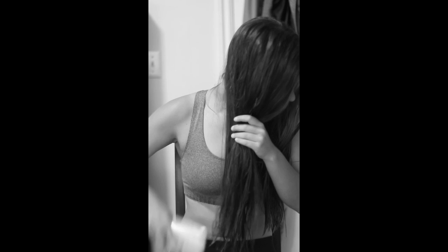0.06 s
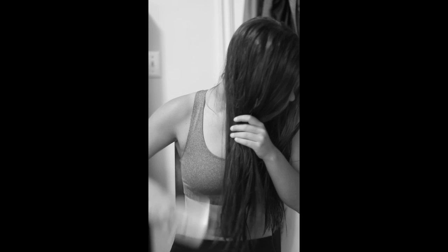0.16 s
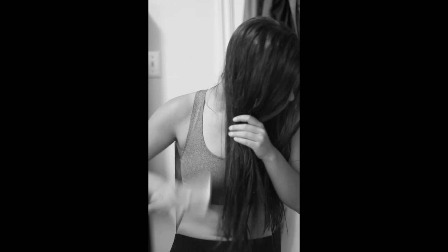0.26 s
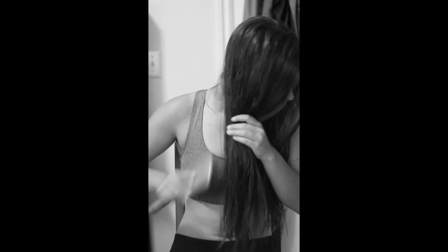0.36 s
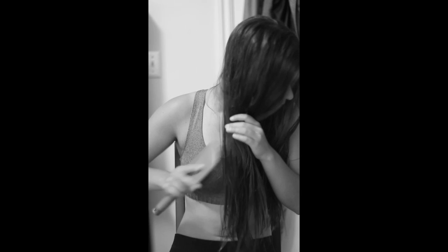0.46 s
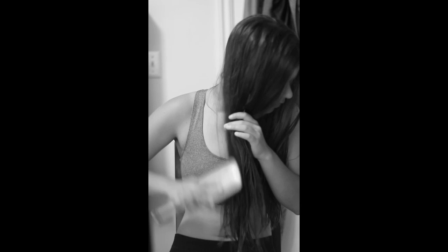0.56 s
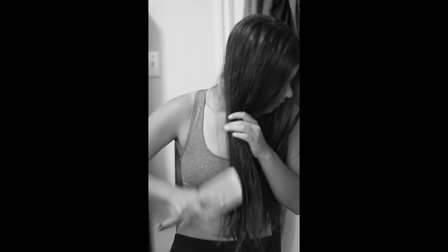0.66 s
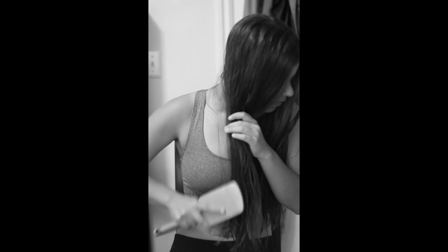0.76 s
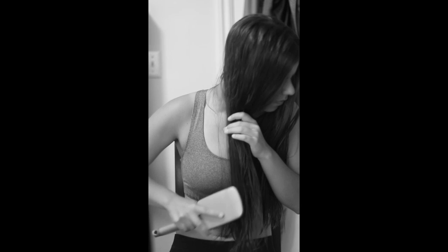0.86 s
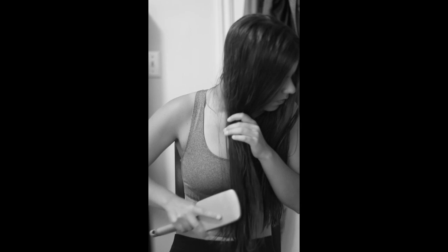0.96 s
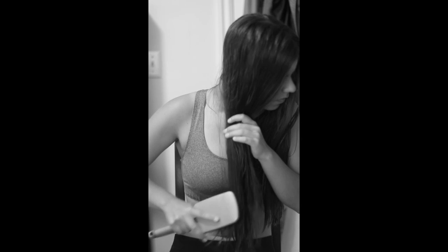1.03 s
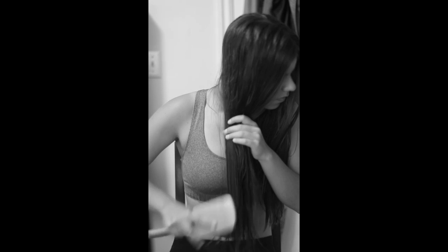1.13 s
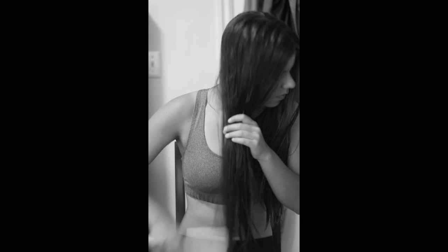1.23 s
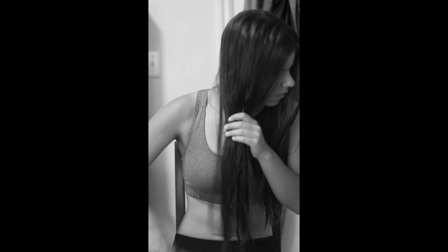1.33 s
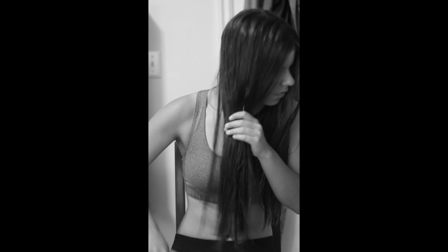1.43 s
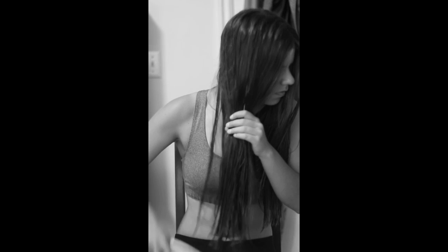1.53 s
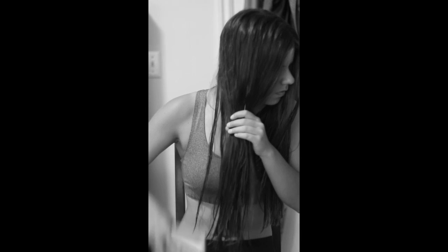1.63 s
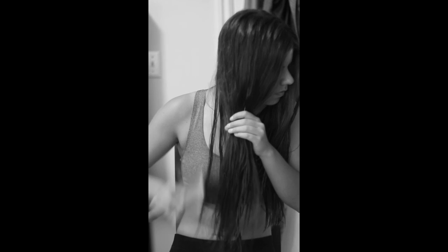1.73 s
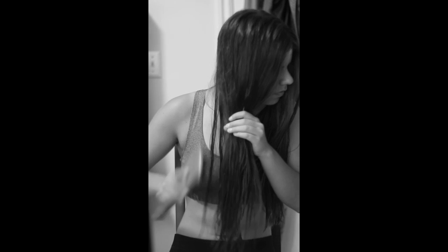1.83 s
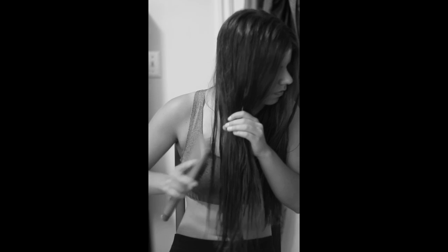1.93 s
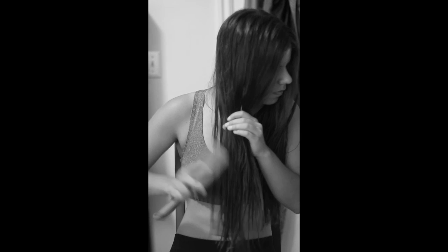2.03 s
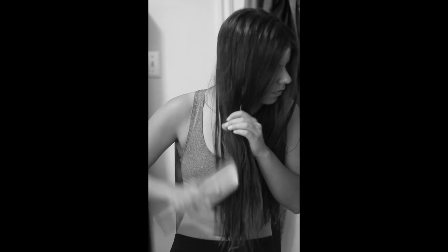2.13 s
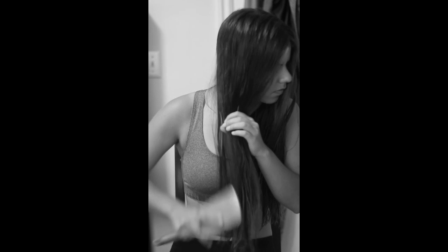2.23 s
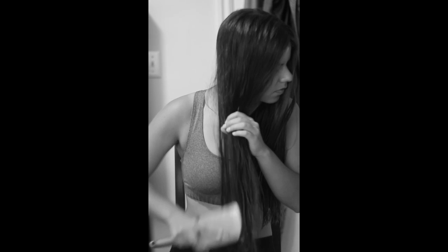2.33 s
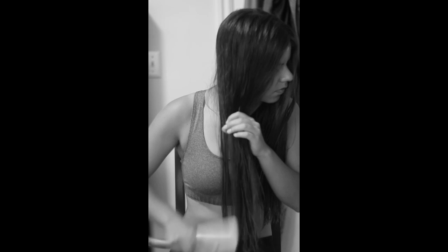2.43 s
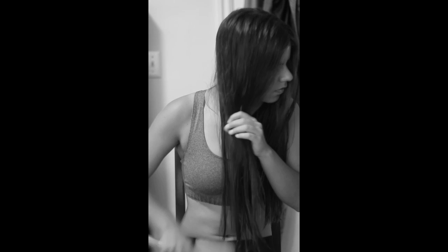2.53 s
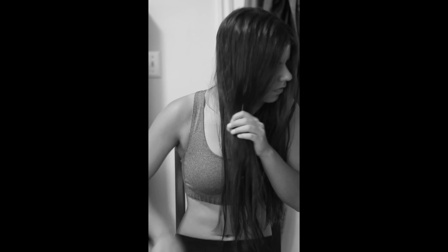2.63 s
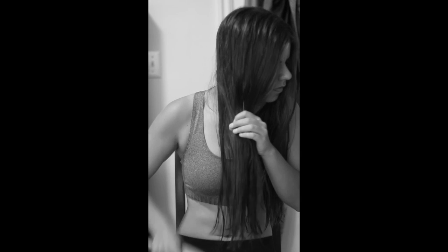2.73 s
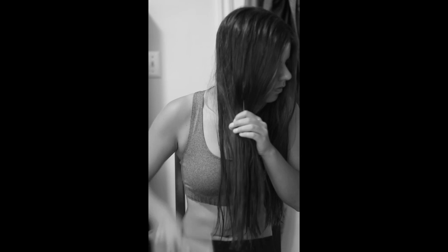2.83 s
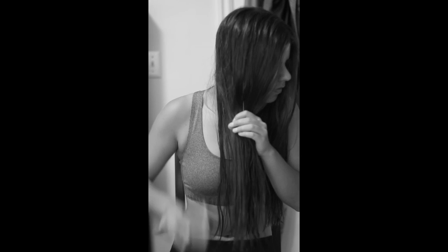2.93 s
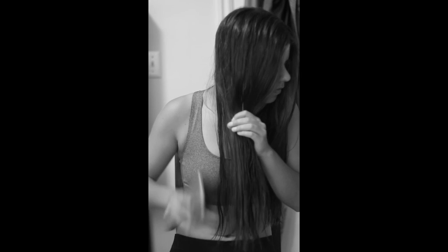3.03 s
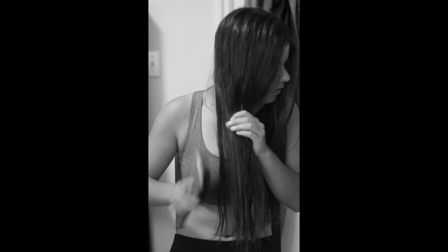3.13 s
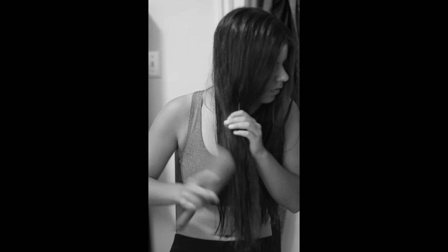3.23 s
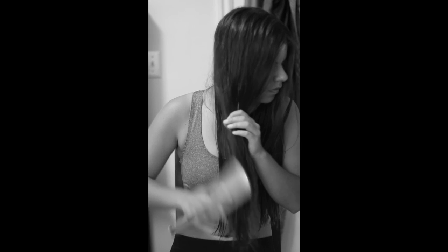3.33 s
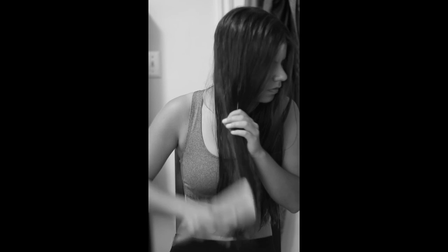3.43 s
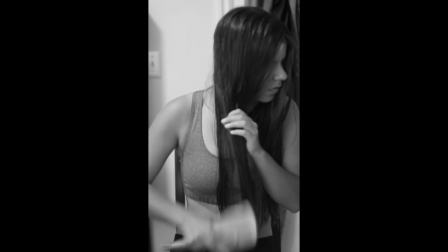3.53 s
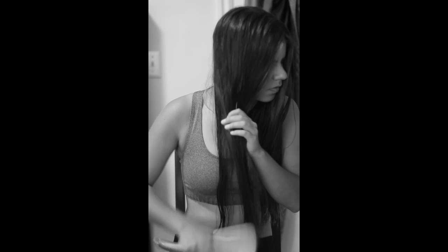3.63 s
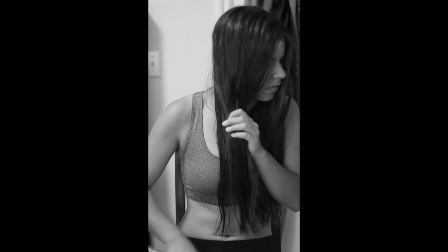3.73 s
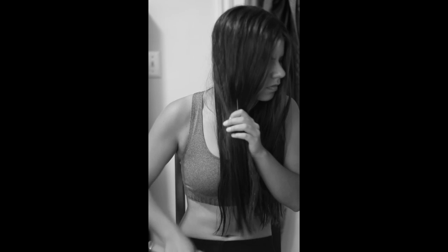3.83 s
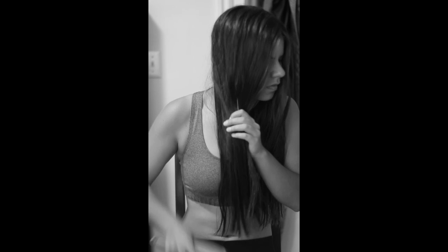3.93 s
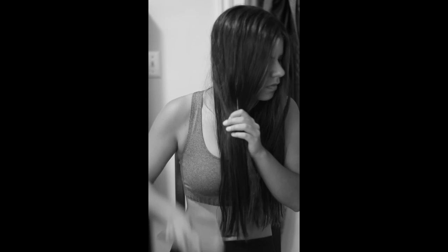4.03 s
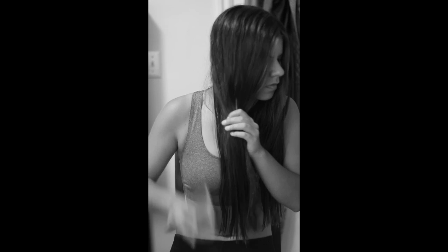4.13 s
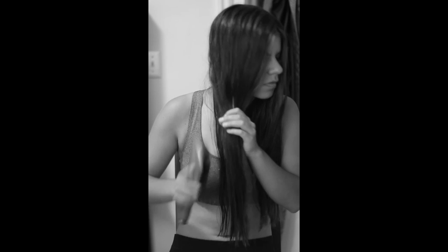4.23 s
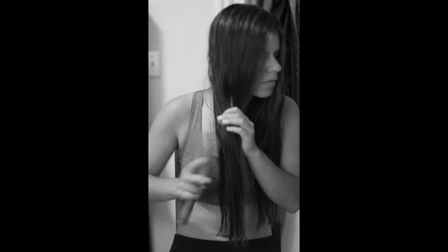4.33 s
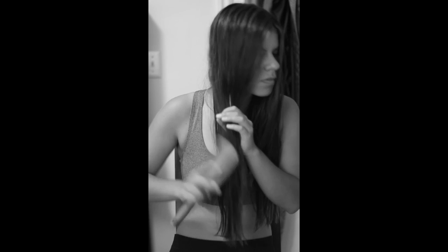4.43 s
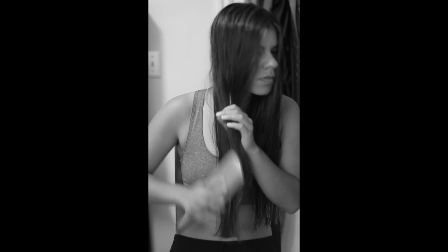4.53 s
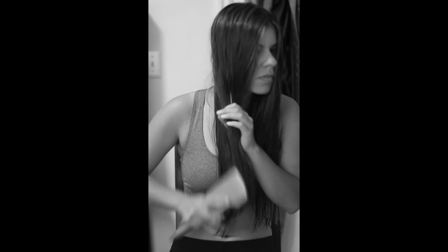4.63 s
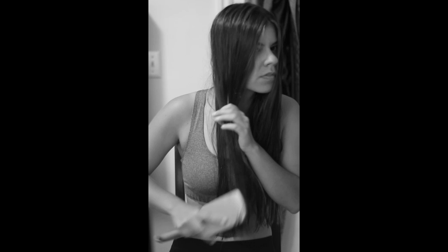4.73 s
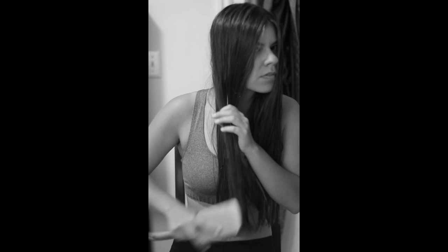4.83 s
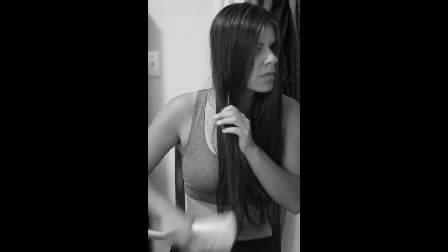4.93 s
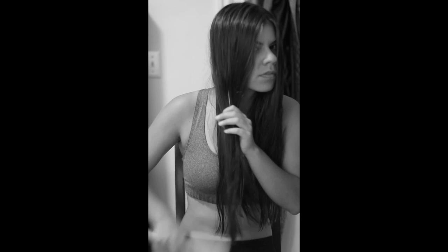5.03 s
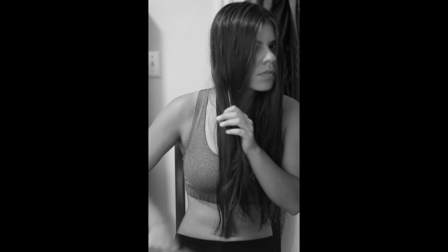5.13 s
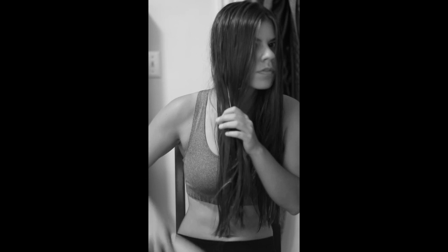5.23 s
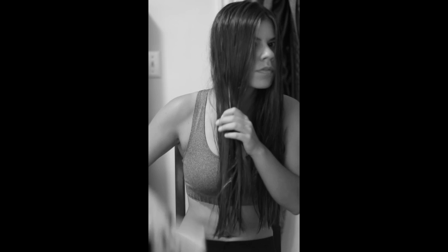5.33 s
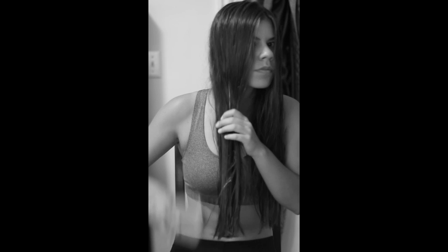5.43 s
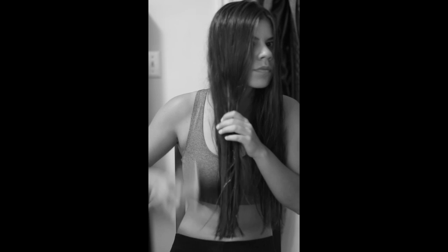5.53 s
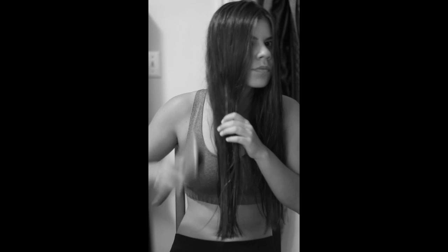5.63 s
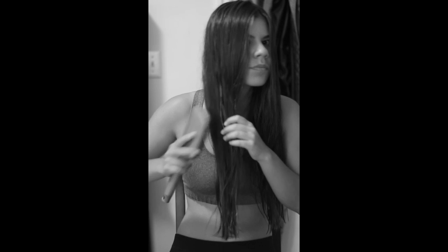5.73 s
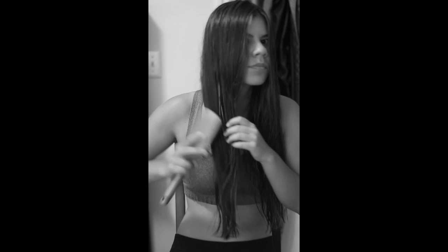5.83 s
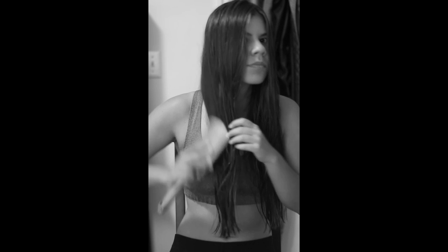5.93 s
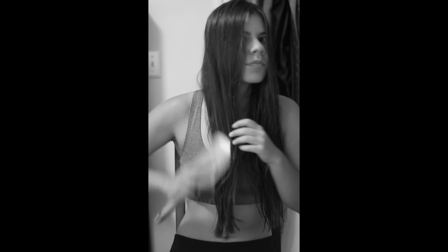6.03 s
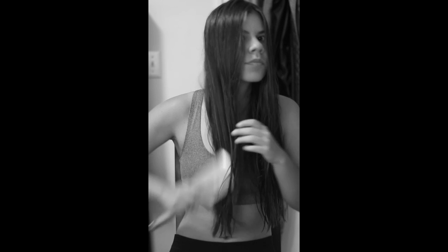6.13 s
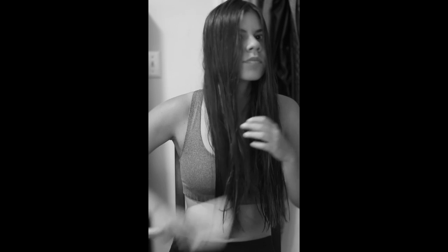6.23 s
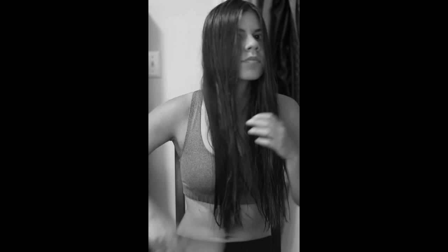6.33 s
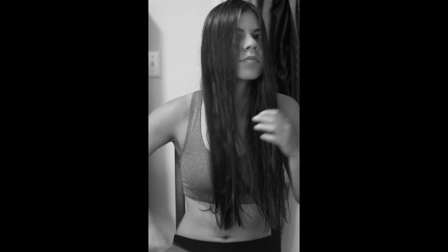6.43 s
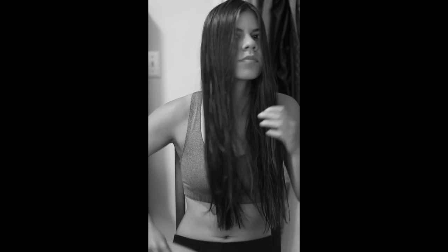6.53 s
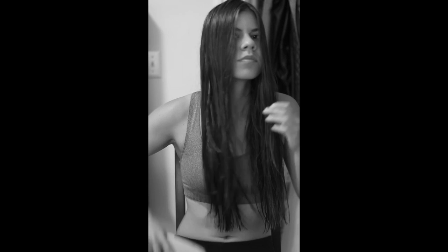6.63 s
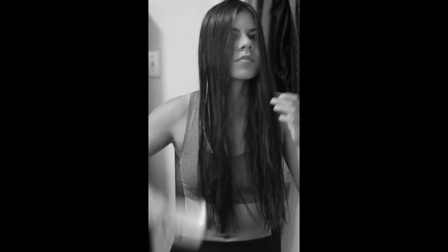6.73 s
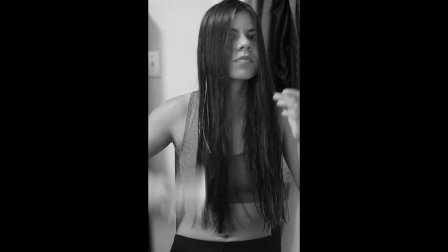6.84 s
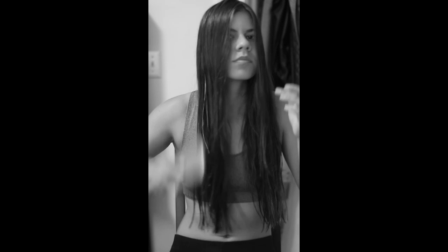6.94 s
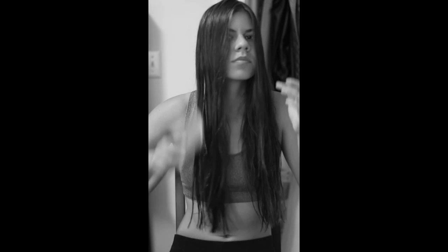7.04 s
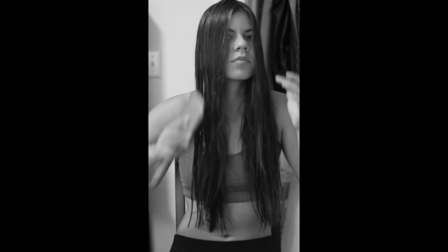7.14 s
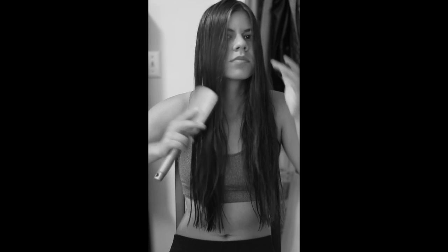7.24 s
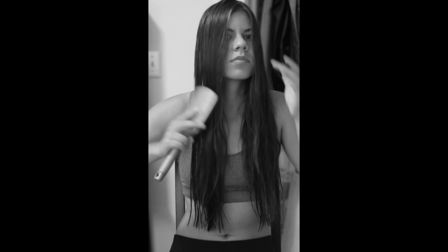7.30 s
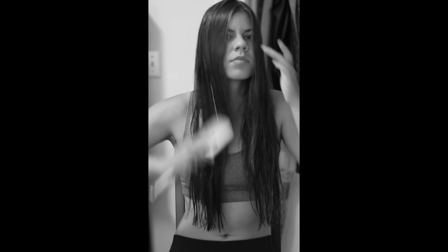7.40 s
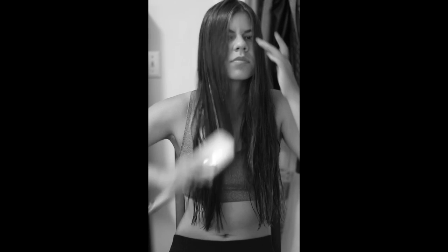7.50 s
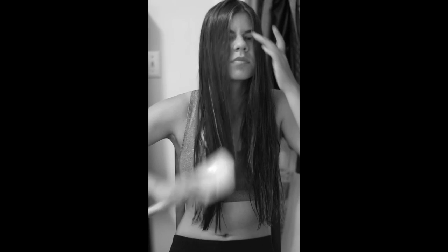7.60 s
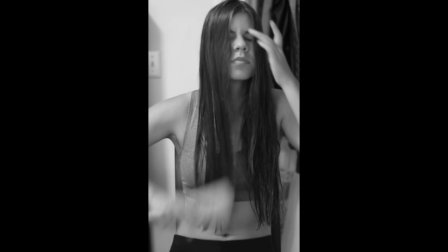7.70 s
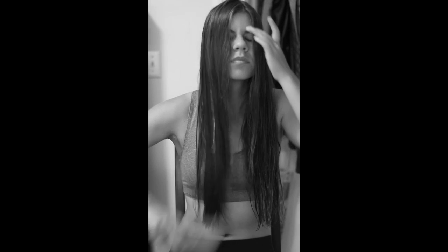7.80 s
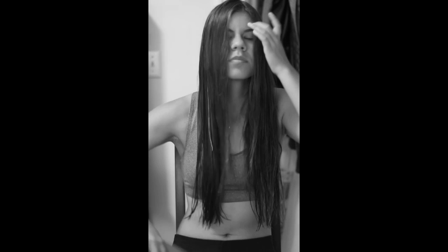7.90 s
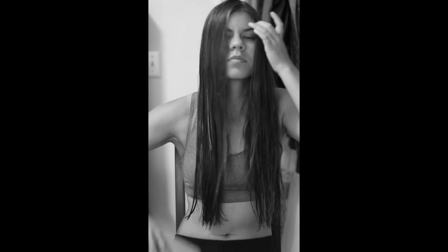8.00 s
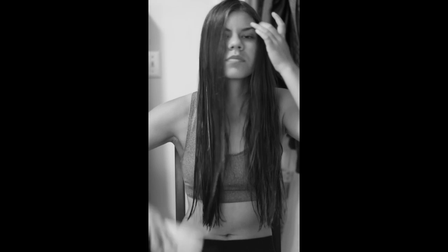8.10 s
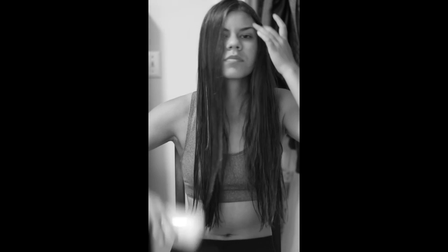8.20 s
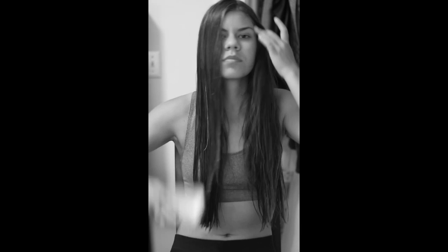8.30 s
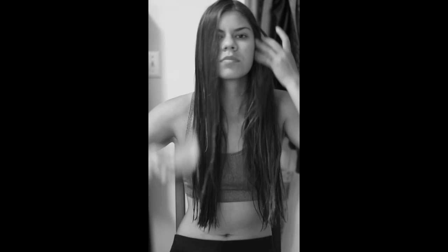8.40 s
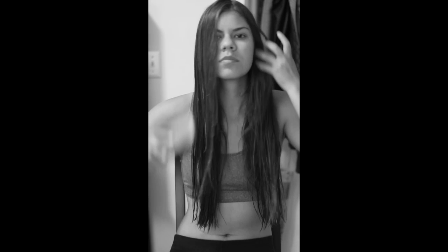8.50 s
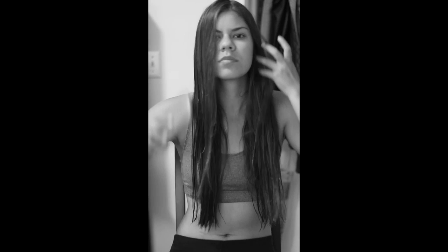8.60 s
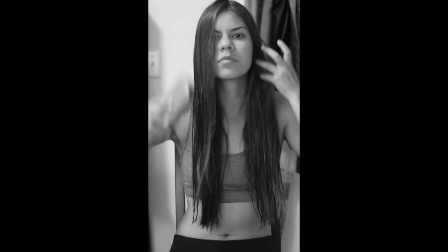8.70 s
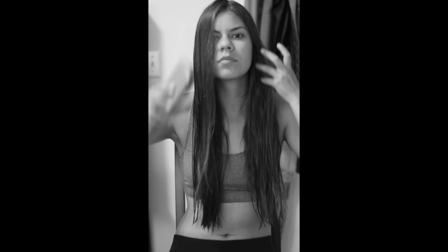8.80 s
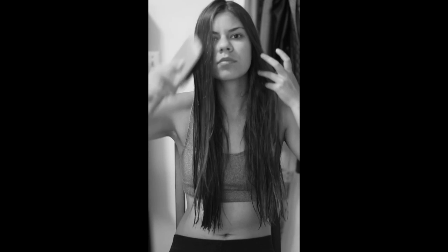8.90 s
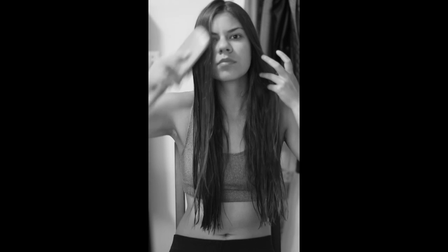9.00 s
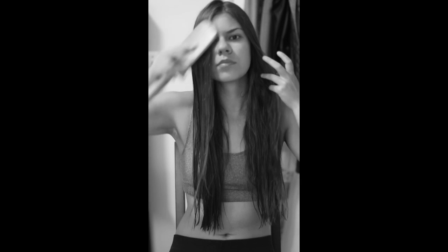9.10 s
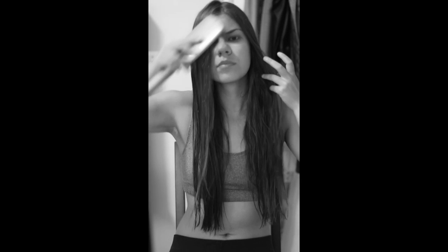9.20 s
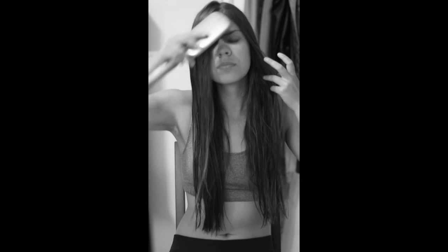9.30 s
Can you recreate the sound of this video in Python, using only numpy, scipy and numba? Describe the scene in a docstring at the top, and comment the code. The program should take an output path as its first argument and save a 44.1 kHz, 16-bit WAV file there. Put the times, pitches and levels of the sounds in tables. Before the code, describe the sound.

A brush is pulled through long tangled hair in repeated scraping strokes, with soft thumps and ticks, in a small quiet room.

```python
"""Brushing long hair

A paddle brush is pulled through long hair, stroke after stroke, in a small quiet room. Strands stick
and slip on the bristles, and these impulses excite the modes of the air cushion, handle, paddle and
pins. Tangles thump the cushion and let go in ticks; once, a strand squeaks on a pin.
The room reverberates over the steady hiss of a phone."""
import sys
import numpy as np
from scipy import signal
from scipy.fft import rfft, irfft, next_fast_len
from scipy.io import wavfile
from scipy.ndimage import uniform_filter1d
from numba import njit

SR = 44100
rng = np.random.default_rng(int(sys.argv[2]) if len(sys.argv) > 2 else 0)


def dump_mix(stems):
    """Bounce the given channels to the path in sys.argv[1] as a 16-bit WAV at rate SR."""
    frames = np.atleast_2d(stems).T  # one column per channel
    limited = np.clip(frames, -1, 1)  # hard clip at full scale
    pcm = np.round(limited * 32767).astype(np.int16)
    wavfile.write(sys.argv[1], SR, pcm)


N = 412776

# Envelope breakpoints, one list a pull, from catch to release: time_s, drum_db, scratch_db
PULLS = [
    [(0.0, -36, -51), (0.028, -49, -63), (0.034, -48.5, -60.5), (0.12, -57.5, -68)],
    [(0.6, -71, -79), (0.668, -54.5, -54.5), (0.768, -46.5, -58), (0.798, -47, -47.5), (0.832, -36, -47.5),
     (0.958, -46, -55), (0.976, -45, -57), (1.076, -55, -63.5), (1.14, -60.5, -66)],
    [(1.165, -45, -69), (1.175, -34.5, -49), (1.235, -39.5, -47), (1.335, -36, -44.5),
     (1.363, -42.5, -46.5), (1.453, -49.5, -57), (1.493, -43, -56), (1.553, -54, -59.5), (1.6, -56, -64)],
    [(2.12, -81, -79), (2.146, -58, -65), (2.198, -49, -54.5), (2.27, -49, -55), (2.324, -39.5, -48.5),
     (2.538, -38.5, -50), (2.648, -51.5, -58.5), (2.674, -56, -61), (2.69, -50, -63)],
    [(2.695, -54, -66), (2.715, -49, -54), (2.735, -48, -59), (2.84, -60.5, -66)],
    [(3.4, -66, -74), (3.422, -54, -56), (3.438, -49, -54), (3.504, -43, -46.5), (3.652, -43.5, -47),
     (3.68, -40.5, -48), (3.76, -49.5, -53.5), (3.785, -50, -57)],
    [(3.79, -44, -58), (3.814, -45, -48), (3.852, -42, -54), (3.87, -49.5, -55.5), (3.95, -56, -63)],
    [(4.515, -60, -68), (4.529, -50, -52), (4.561, -45, -53.5), (4.613, -49.5, -52.5), (4.721, -42.5, -53),
     (4.735, -41.5, -52), (4.751, -40, -45), (4.965, -54, -56), (5.079, -50, -54), (5.125, -60, -64),
     (5.143, -56, -62), (5.18, -64, -66)],
    [(5.93, -70, -81), (5.958, -55, -63), (5.974, -47, -62), (6.072, -49, -61), (6.092, -35, -46),
     (6.13, -39, -53.5), (6.15, -35.5, -49.5), (6.262, -45, -51), (6.404, -40, -48.5), (6.505, -51, -58)],
    [(6.51, -54, -60), (6.526, -38, -53), (6.552, -48.5, -57), (6.576, -45.5, -57), (6.7, -58, -69)],
    [(7.33, -66, -72), (7.34, -70, -79), (7.364, -58, -66.5), (7.556, -50, -56.5), (7.582, -51, -54.5),
     (7.61, -41.5, -51), (7.722, -45, -53.5), (7.836, -35.5, -43), (7.868, -41.5, -47.5), (7.98, -43, -58),
     (8.14, -54.5, -66), (8.162, -65, -75), (8.17, -57.5, -63.5)],
]
# Grip of each pull; cushion modes and handle are relative to drum_db, pins to scratch_db:
# pitch_hz, cushion_modes_db, handle_db, pins_db
GRIPS = [(205, -14, -17.5, -9), (193, -2.5, -18.5, -7.5), (206, -2.5, -11, -7), (195, -6.5, -11.5, -5),
         (232, -3.5, -17, -5.5), (199, -4, -12.5, -4.5), (221, -6, -24, -9.5), (198, -5.5, -12.5, -3),
         (205, -9, -13, -6), (233, -1.5, -22.5, -8), (197.5, -8.5, -14.5, -5.5)]
# Modes of the brush's parts and of the one pin that squeaks: frequency_hz, bandwidth_hz, gain_db
CUSHION_MODES = [(255.4, 14.5, -2), (317.5, 44, 2.5), (356.6, 42, 4.5), (500, 30.4, -8.5), (538, 26, -4.5)]
HANDLE_MODES = [(73, 30, -5), (103.5, 61, -1.5), (144, 31, 2)]
PADDLE_MODES = [(755, 113, 1), (962, 123, 4), (1126, 196, 2.5), (1446, 290, 1.5), (2000, 240, -8.5)]
PIN_MODES = [(2375, 940, 7), (3510, 1000, 7.5), (5080, 990, 2), (6330, 5000, -10.5)]
SQUEAK_MODES = [(3000, 300, -6), (3450, 250, 0), (5200, 300, -6), (6500, 300, -20)]
# Standing waves of the room: frequency_hz, gain_db, t60_s
ROOM_MODES = [(210, -10, 0.95), (305, -23, 0.75)]
# Spectrum of the background noise: frequency_hz, relative_density_db
HISS_SPECTRUM = [(15, -26.5), (25, -8.5), (91, -3.5), (202, -3), (265, -4.5), (481, -7), (532, -6.5),
                 (617, -7.5), (1300, -11), (3100, -15), (4510, -21), (9500, -22.5), (12400, -68),
                 (20900, -120)]
# Strands snapping off the pins: start_s, peak_db, relative_crack_db
TICKS = [(0.788, -56, -14), (0.846, -51, -11), (1.1722, -47, -10), (1.2141, -46, -13), (1.2725, -38, -14),
         (2.3401, -45, -16), (2.5187, -50, -10), (3.417, -47, -14), (3.469, -50, -15), (3.5698, -34, -21),
         (3.5758, -36, -8), (3.5803, -36, -14), (4.5276, -49, -16), (4.7387, -37, -11), (4.7486, -36, -15),
         (4.758, -37, 2.5), (4.767, -35, -6), (4.7714, -31, -10), (4.7802, -34, -16), (6.0823, -51, -20),
         (6.2557, -46, -18), (7.6006, -45, -17), (7.817, -38.5, -15)]
# Tangles jolting the cushion: start_s, peak_db, pitch_hz
THUMPS = [(0.823, -29.5, 148), (0.967, -37.5, 159), (1.170, -24, 139), (1.297, -27.5, 153),
          (1.328, -30, 164), (2.305, -44, 179), (2.706, -45, 200), (2.714, -46.5, 227), (3.603, -39, 270),
          (3.665, -32, 208), (3.833, -42, 233), (4.725, -30, 144), (6.09, -27.5, 145), (6.33, -36, 180),
          (6.385, -31.5, 161), (6.52, -34.5, 285), (7.787, -39, 145), (7.817, -30.5, 262)]


def undb(db):
    """Amplitude ratio of a level in decibels."""
    return 10 ** (np.asarray(db) / 20)


def level(x, db=0):
    """Normalisation to an rms level."""
    return x * undb(db) / np.sqrt(np.mean(x ** 2))


@njit
def resonator(x, hz, width_hz):
    """A damped oscillator with unit gain at resonance; its frequency may be constant or moving."""
    centre_hz = hz * np.ones(len(x))
    y, band, low = np.empty(len(x)), 0., 0.
    for i in range(len(x)):
        step, damping = np.tan(np.pi * centre_hz[i] / SR), width_hz / centre_hz[i]
        velocity = (band + step * (x[i] - low)) / (1 + step * (step + damping))
        band, low = 2 * velocity - band, low + 2 * step * velocity
        y[i] = damping * velocity
    return y


def body(force, modes):
    """Modal superposition: one force drives several resonances, summed in alternating polarity."""
    return level(sum((-1) ** k * undb(db) * resonator(force, hz, width_hz)
                     for k, (hz, width_hz, db) in enumerate(modes)))


def wander(rate_hz):
    """Slow random modulation: held values, smoothed twice, with a spread near 1."""
    hold = int(SR / rate_hz)
    steps = np.repeat(rng.standard_normal(N // hold + 1), hold)
    return 1.9 * uniform_filter1d(uniform_filter1d(steps, hold), hold)[:N]


def slips(per_s, spread_db, patchy_db):
    """Stick-slip friction as a Poisson train of impulses, in stronger and weaker patches."""
    timing, strength, direction = rng.random((3, N))
    size = undb(spread_db * np.minimum(-np.log(1 - strength), 3.5))
    return (timing < per_s / SR) * size * np.sign(direction - .5) * undb(patchy_db * wander(35))


def pull_envelope(column):
    """Attack and decay in dB: the bristles catch at once, and the last strands slide out slowly."""
    catch_db_per_s, release_db_per_s = 9000, 74
    t, envelope = np.arange(N) / SR, np.full(N, -200.)
    for pull in PULLS:
        times, levels = np.transpose(pull)[[0, column]]
        attack = levels[0] - catch_db_per_s * (times[0] - t)
        slide = np.interp(t, times, levels) - release_db_per_s * np.maximum(t - times[-1], 0)
        envelope = np.where(t < times[0], np.maximum(envelope, attack), slide)
    return envelope


def even_out(x):
    """Amplitude compression: evens out the rumble's loudness, so it stays steady without stray thumps."""
    swing = np.sqrt(uniform_filter1d(x ** 2, int(0.017 * SR)) + 0.26)
    return level(x / swing ** 0.98)


def brushing():
    """Forced vibration: coarse slips drive cushion and handle, fine slips drive paddle and pins."""
    drum_db, scratch_db = pull_envelope(column=1), pull_envelope(column=2)
    regrip_s = [pull[0][0] - .005 for pull in PULLS[1:]]
    pull_index = np.searchsorted(regrip_s, np.arange(N) / SR)
    pitch_hz, modes_db, handle_db, pins_db = np.array(GRIPS)[pull_index].T
    tugs = slips(per_s=1500, spread_db=1.5, patchy_db=-3.5)
    note_hz = pitch_hz + 10.5 * wander(20)
    cushion_note = level(resonator(resonator(tugs, note_hz, 100), note_hz, 170))
    fine_slips = slips(per_s=6000, spread_db=2, patchy_db=0.73)
    # A hard pull favours the cushion's upper modes; a light touch favours the pins.
    firm_drum_db, firm_scratch_db = -44, -51
    effort_db = np.clip(drum_db - firm_drum_db, -15, 15)
    touch_db = np.clip(scratch_db - firm_scratch_db, -10, 10)
    layers = [(cushion_note, drum_db - 2.5, .8),
              (body(tugs, CUSHION_MODES), drum_db + modes_db + 0.07 * effort_db, 1.07),
              (body(tugs, HANDLE_MODES), drum_db + handle_db - 0.04 * effort_db, 1.84)]
    layers = [(even_out(x), db, waver_db) for x, db, waver_db in layers]
    layers += [(body(fine_slips, PADDLE_MODES), scratch_db - 2.5, 0.49),
               (body(fine_slips, PIN_MODES), scratch_db + pins_db - 0.12 * touch_db, .4)]
    return sum(x * undb(db + waver_db * wander(20)) for x, db, waver_db in layers)


def room(x):
    """Reverberation: a dull diffuse tail and two lingering standing waves follow the direct sound."""
    tail_t60_s, tail_db, cutoff_hz = 0.37, -15, 3350
    t = np.arange(SR) / SR
    tail = signal.lfilter(*signal.butter(1, cutoff_hz, fs=SR), rng.standard_normal(SR))
    tail *= undb(-60 * t / tail_t60_s) * (t > .006)
    response = undb(tail_db) * tail / np.sqrt(np.sum(tail ** 2))
    for hz, db, t60_s in ROOM_MODES:
        decay = undb(-60 * t / t60_s)
        response += undb(db) * np.sin(2 * np.pi * hz * t) * decay * 2 / np.sum(decay)
    return x + signal.fftconvolve(x, response)[:N]


def hiss():
    """Stationary coloured noise: room tone together with the microphone's self-noise."""
    size = next_fast_len(N)
    hz, db = np.transpose(HISS_SPECTRUM)
    bin_hz = np.maximum(np.arange(size // 2 + 1) * SR / size, 1)
    colour = undb(np.interp(np.log(bin_hz), np.log(hz), db))
    return level(irfft(rfft(rng.standard_normal(size)) * colour, size)[:N], db=-62)


def ticks():
    """Impulsive excitation: a burst of snaps knocks the paddle, rings two pins and cracks brightly."""
    burst_t60_s, pins_hz = 0.01, np.array([3000, 4640])
    out, t = np.zeros(N + SR), np.arange(SR // 10) / SR
    for start_s, peak_db, crack_db in TICKS:
        long_pin_hz, short_pin_hz = pins_hz * np.exp(.08 * rng.standard_normal(2))  # a new pair each tick
        burst = rng.standard_normal(len(t)) * undb(-60 * np.maximum(t - .001, 0) / burst_t60_s)
        knock, long_pin, short_pin, crack = (
            resonator(resonator(burst, hz, width_hz), hz, 2 * width_hz)
            for hz, width_hz in ((1400, 900), (long_pin_hz, 1500), (short_pin_hz, 1500), (8200, 2500)))
        tick = level(knock, -5.5) + level(long_pin) + level(short_pin, -3.5) + level(crack, crack_db)
        out[int(start_s * SR):][:len(t)] += undb(peak_db) * tick / np.max(np.abs(tick))
    return out[:N]


def thumps():
    """Damped free vibration: a tangle jolts the cushion, ringing its note and one upper mode."""
    t60_cycles, upper_ratio, upper_db = 8.6, 2.6, -14
    out, t = np.zeros(N + SR), np.arange(SR // 4) / SR
    for start_s, peak_db, pitch_hz in THUMPS:
        phase = 2 * np.pi * pitch_hz * t
        ring = np.sin(phase) + undb(upper_db) * np.sin(upper_ratio * phase)
        swell = (1 - np.exp(-t / 0.005)) ** 2
        thump = ring * swell * undb(-60 * t * pitch_hz / t60_cycles)
        out[int(start_s * SR):][:len(t)] += undb(peak_db) * thump / np.max(np.abs(thump))
    return out[:N]


def squeak():
    """Frictional excitation: a strand chatters on one pin, whose ring fades as it slides off."""
    start_s, level_db = 2.7105, -50.5
    rise_s, fade_after_s, t60_s = .002, .009, .06
    t = np.arange(N) / SR - start_s
    envelope = np.clip(t / rise_s, 0, 1) * undb(-60 * np.clip(t - fade_after_s, 0, 1) / t60_s)
    return undb(level_db) * envelope * body(rng.standard_normal(N), SQUEAK_MODES)


def scene():
    """Superposition of brush, room and hiss; a body so small radiates no deep bass."""
    bass_cut = signal.butter(3, 62, "high", fs=SR, output="sos")
    brush = signal.sosfilt(bass_cut, brushing() + thumps() + ticks() + squeak())
    return (room(brush) + hiss())[None]


def record(dry):
    """Band limiting: the phone's steep low-pass filter removes the top of the treble."""
    cutoff_hz = 9700
    return signal.sosfilt(signal.ellip(8, .3, 45, cutoff_hz, fs=SR, output="sos"), dry)


dry = scene()
out = record(dry)
dump_mix(out)
```